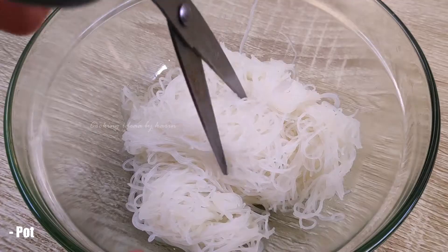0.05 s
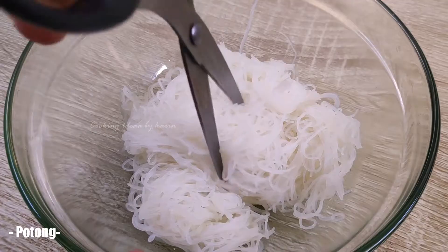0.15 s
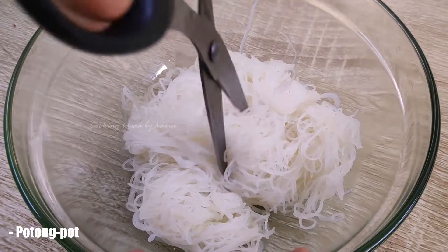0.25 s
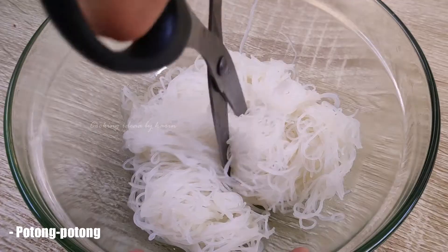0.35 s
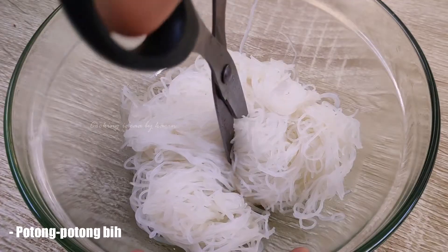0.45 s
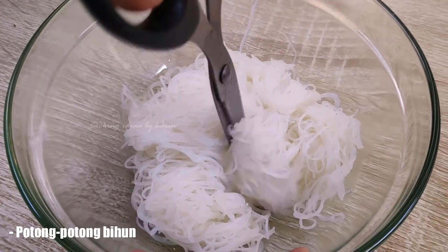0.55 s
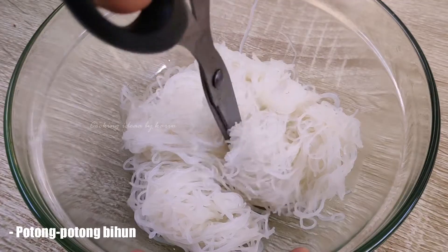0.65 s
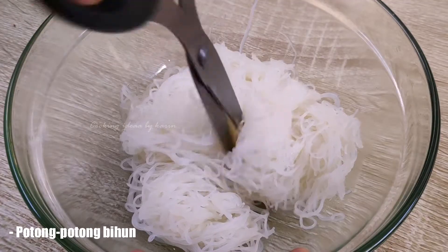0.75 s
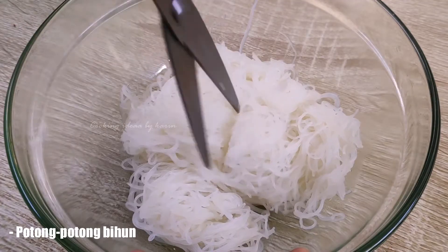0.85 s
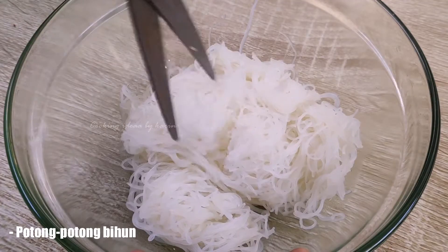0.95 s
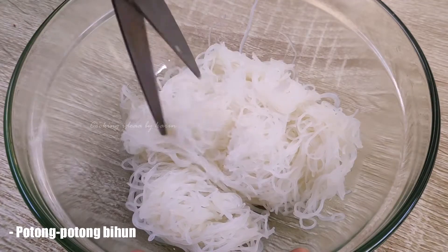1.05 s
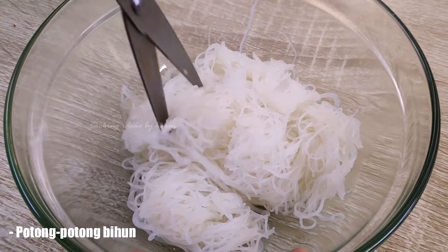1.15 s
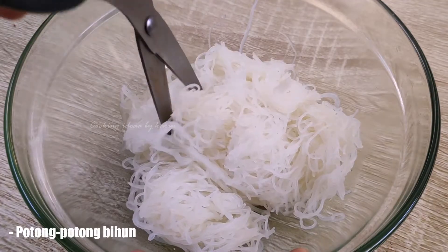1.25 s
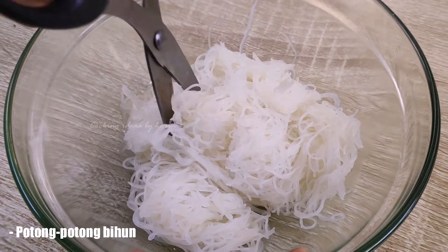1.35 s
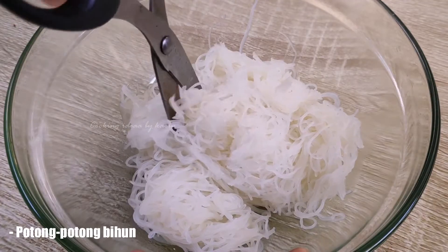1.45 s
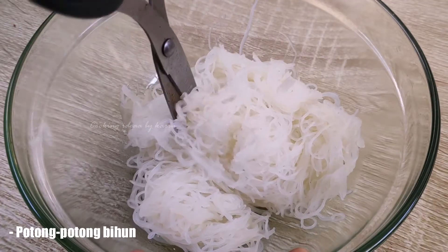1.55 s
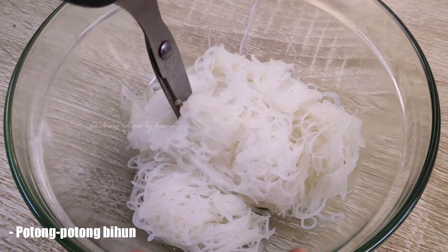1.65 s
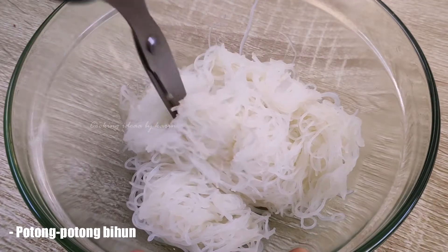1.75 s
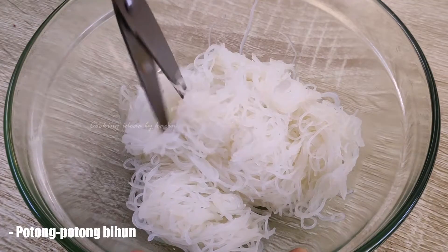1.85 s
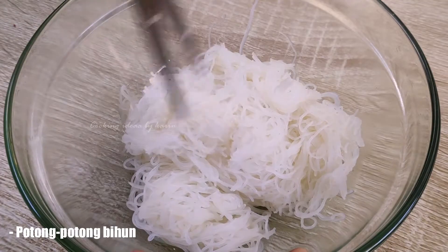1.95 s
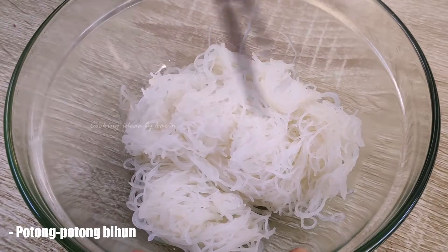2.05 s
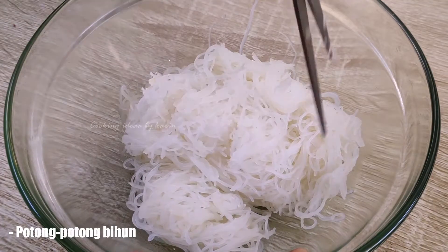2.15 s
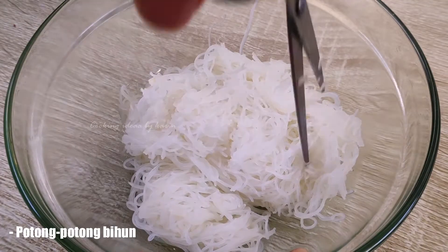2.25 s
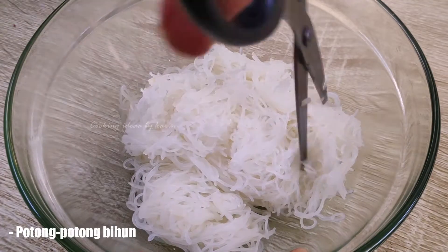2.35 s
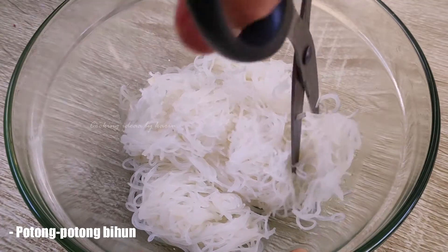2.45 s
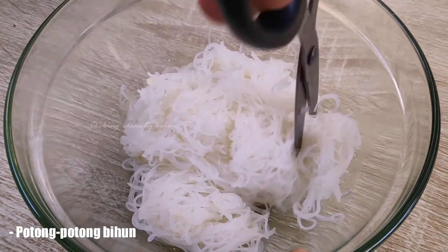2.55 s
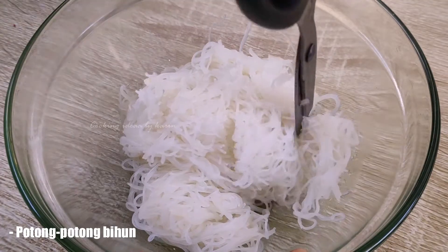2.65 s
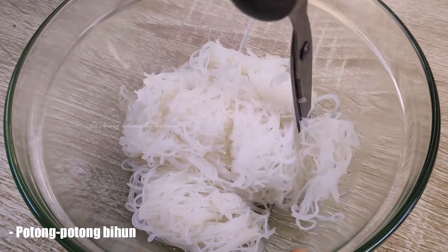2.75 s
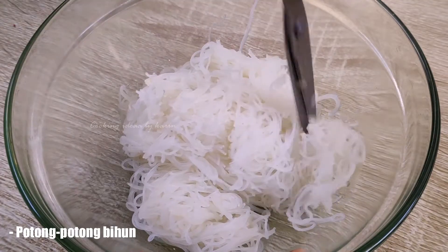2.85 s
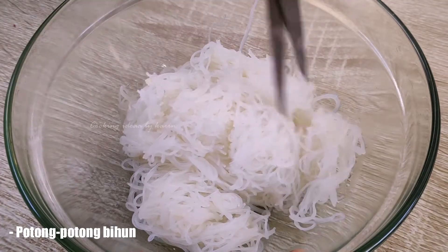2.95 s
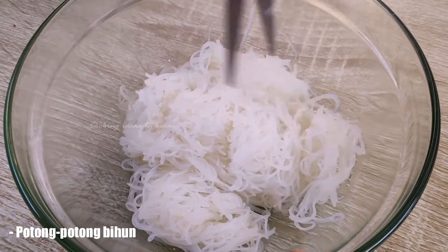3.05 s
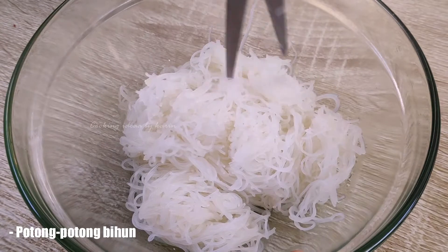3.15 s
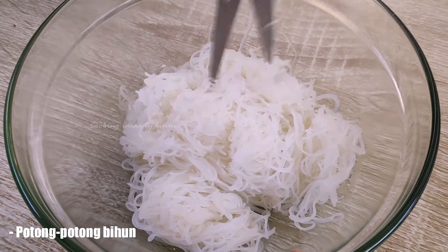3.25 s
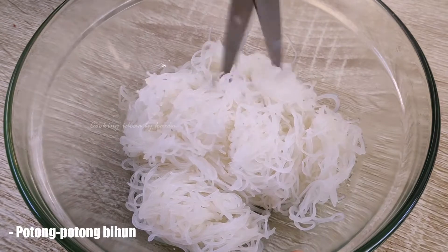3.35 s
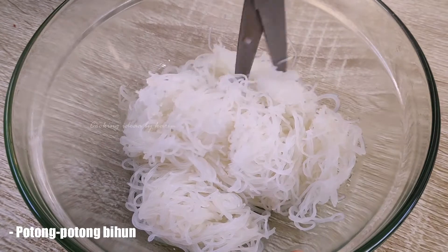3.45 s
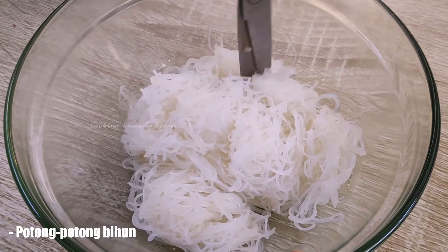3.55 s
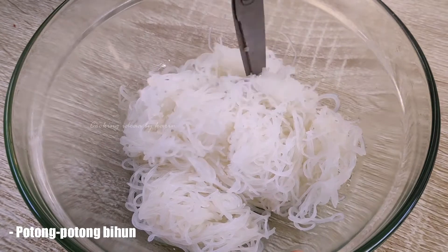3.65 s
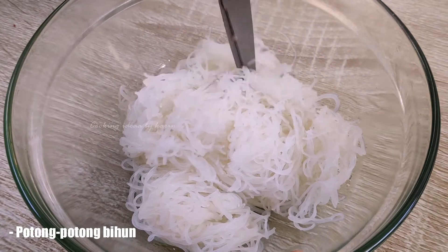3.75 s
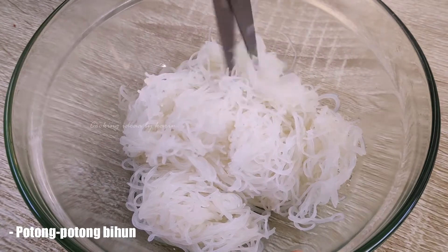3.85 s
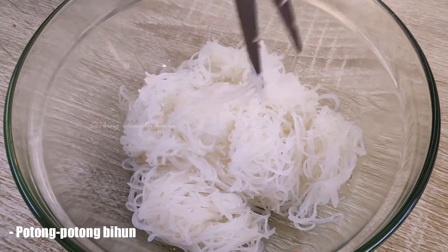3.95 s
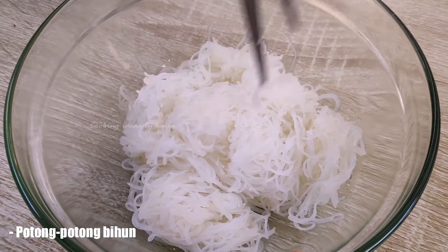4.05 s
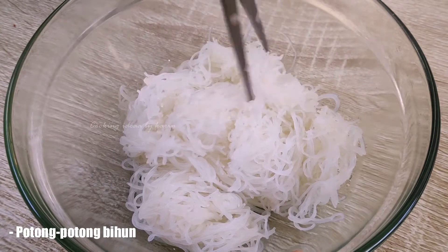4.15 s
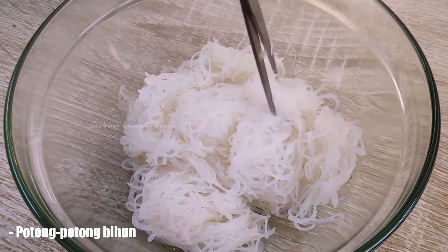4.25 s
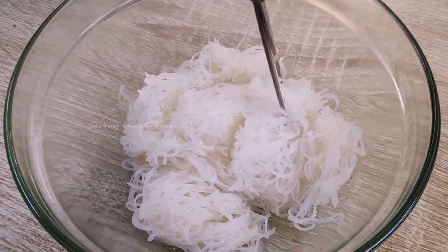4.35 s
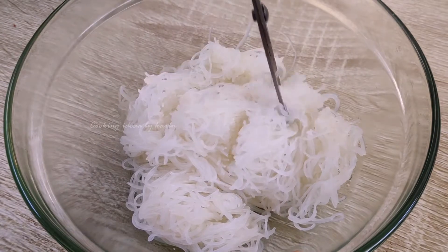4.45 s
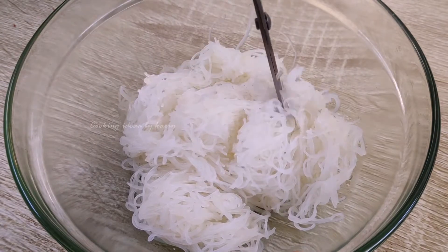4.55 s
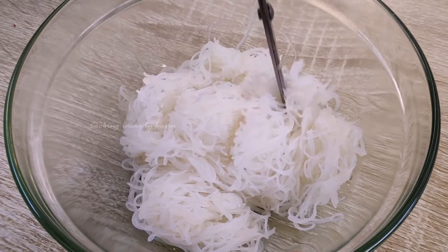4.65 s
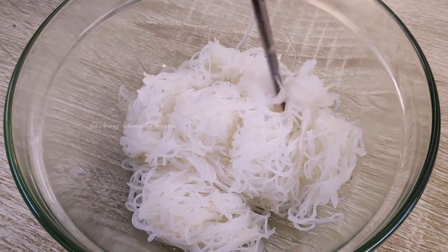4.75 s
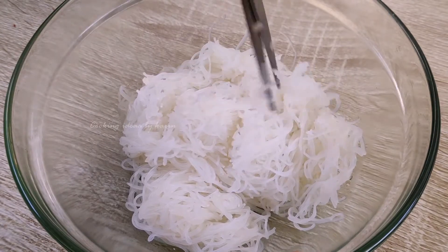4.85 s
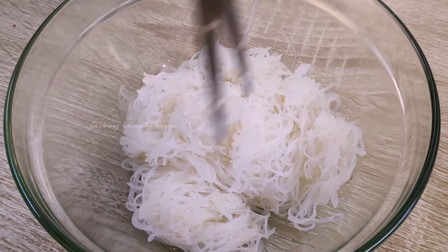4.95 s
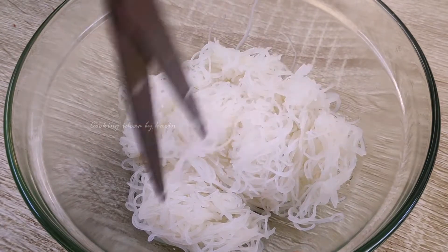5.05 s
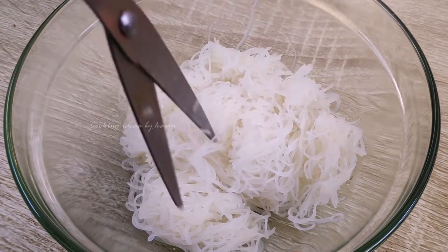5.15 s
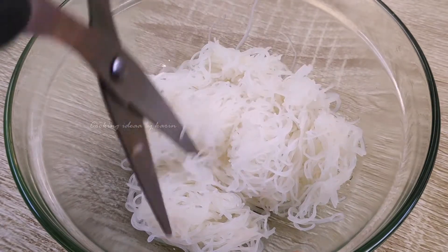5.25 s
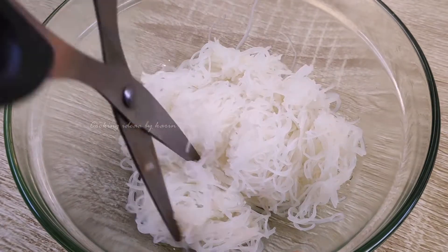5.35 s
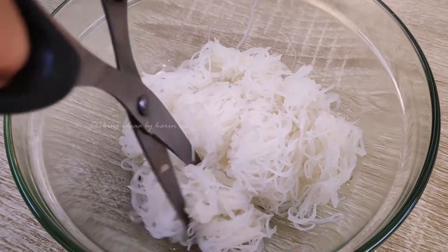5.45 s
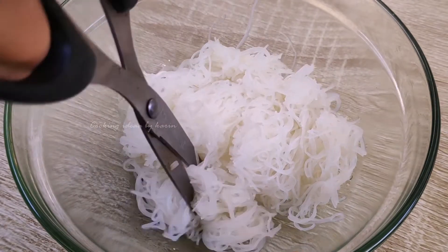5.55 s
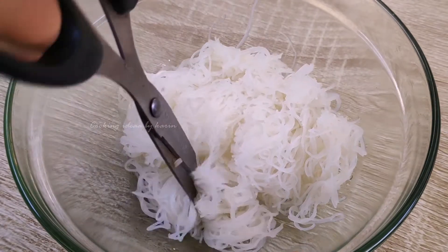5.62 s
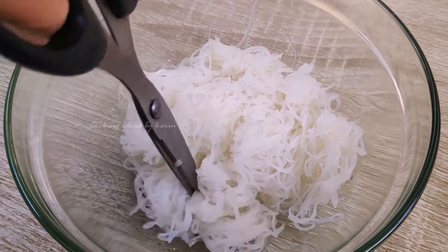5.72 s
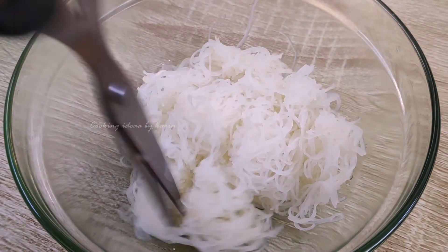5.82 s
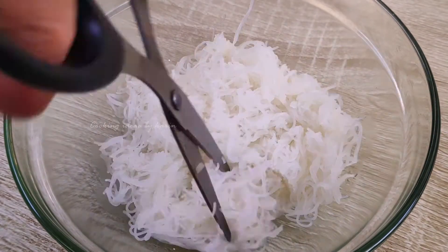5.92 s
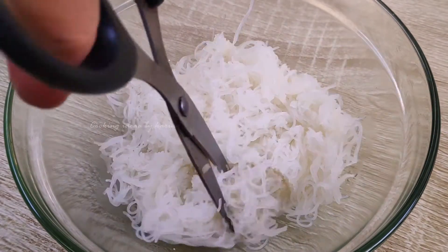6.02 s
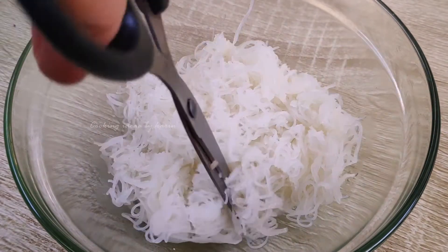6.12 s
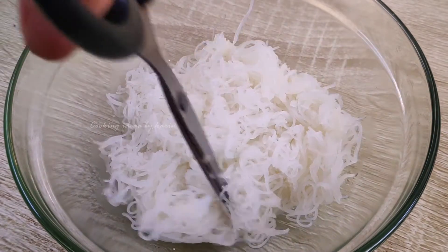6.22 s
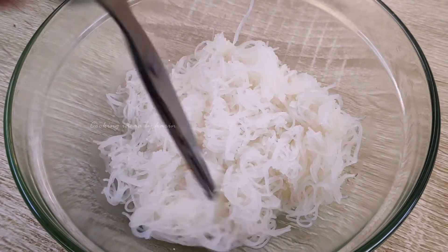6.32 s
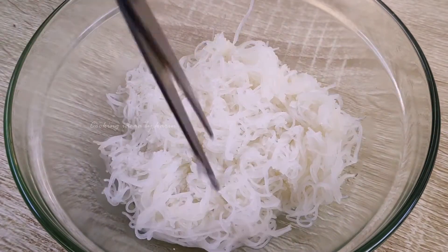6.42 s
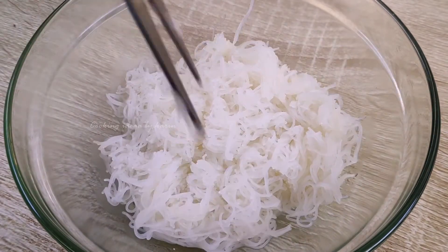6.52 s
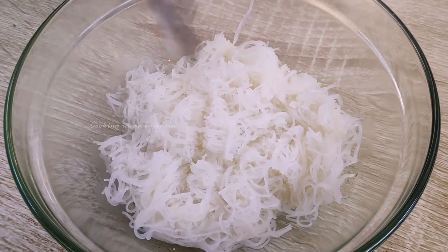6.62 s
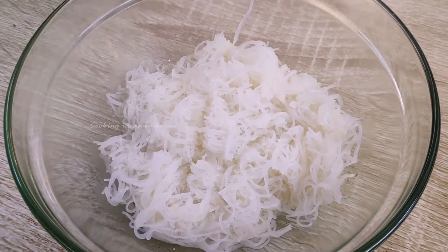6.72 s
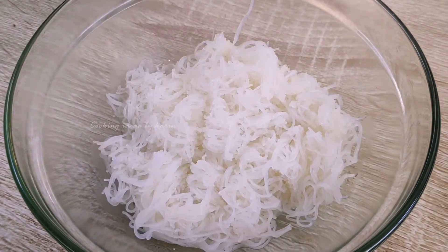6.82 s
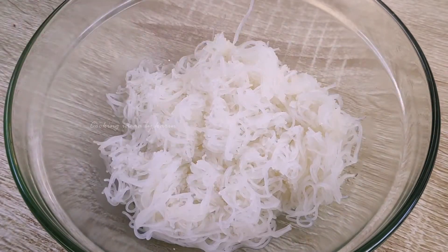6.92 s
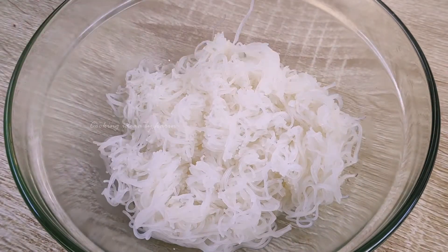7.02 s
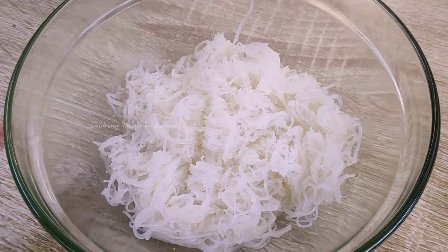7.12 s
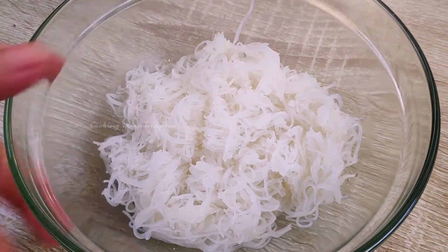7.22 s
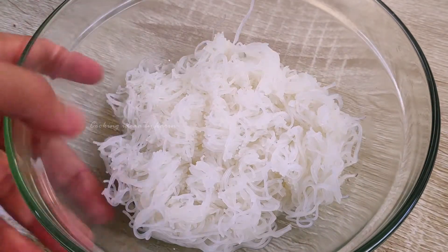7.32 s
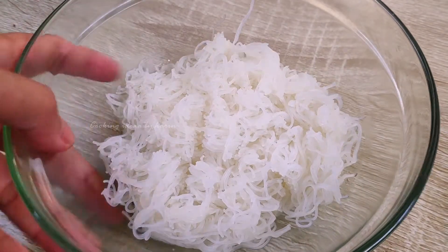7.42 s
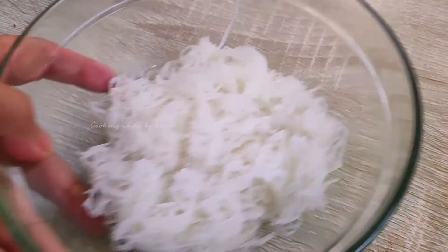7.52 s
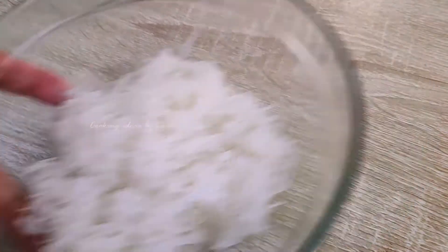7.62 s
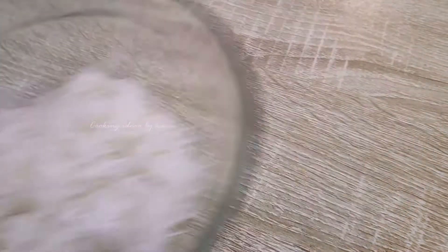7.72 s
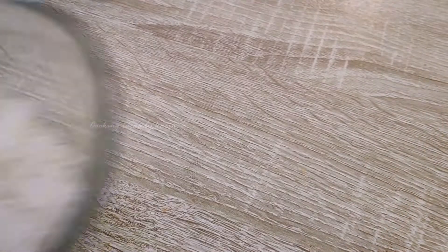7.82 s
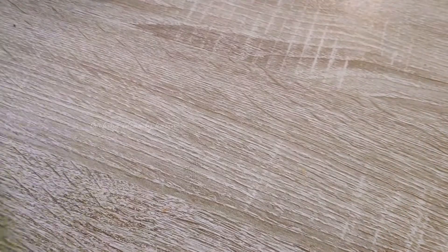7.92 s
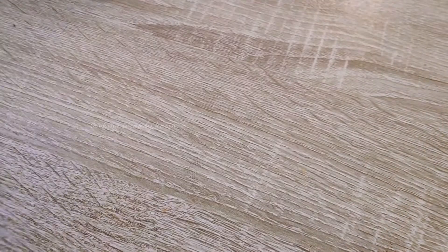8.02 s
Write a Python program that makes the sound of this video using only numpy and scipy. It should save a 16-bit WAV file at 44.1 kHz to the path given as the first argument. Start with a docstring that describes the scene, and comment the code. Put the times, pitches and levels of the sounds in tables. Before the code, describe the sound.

Very close to the microphone, steel scissors cut soaked noodles in a glass bowl on a wooden table. Each snip is a thin metal rub, small catches, then a loud, crisp clack, followed by a light reopening tick. Blade tips sometimes thud against the bowl and skid. After seven snips there is a low handling rumble, then the bowl is dragged off with a brief wooden scrape. A faint appliance hum sits in a ringing kitchen.

```python
"""Scissors snipping wet noodles

Steel kitchen scissors snip seven times through soaked rice noodles in a glass bowl on a wooden table.
The blades rub, catch and shear, then hit their stop: short bursts of noise coloured like steel, plus a ping.
A tip sometimes knocks the bowl and skids on: thuds, dying tones and uneven stick-slip clicks.
Near the end the bowl is slid away. An appliance hums as steady tones; the kitchen rings, cut once by a splice.
The close microphone's limiter ducks after each clack."""
import sys
import numpy as np
from scipy import signal
from scipy.fft import rfft, irfft
from scipy.io import wavfile
from scipy.ndimage import uniform_filter1d, minimum_filter1d

SR = 44100
rng = np.random.default_rng(int(sys.argv[2]) if len(sys.argv) > 2 else 0)


def inscribe(sig):
    """Save sig as 16-bit PCM at rate SR to the path in sys.argv[1].

    A 1-D sig is mono; a 2-D sig holds one channel per row.
    Samples are clipped to [-1, 1] before scaling.
    """
    pcm = np.round(np.clip(np.atleast_2d(sig).T, -1, 1) * 32767)
    wavfile.write(sys.argv[1], SR, pcm.astype(np.int16))


N = 356138
TIME = np.arange(N) / SR


def from_db(db):
    """Turn decibels into a gain."""
    return 10 ** (np.asarray(db) / 20)


def rms_one(x):
    """Scale to an rms (average strength) of 1."""
    return x / np.sqrt(np.mean(x ** 2) + 1e-20)


def at_hz(points, hz, axis=1):
    """Read a table column between its rows, on a log-frequency axis."""
    points = np.array(points)
    return np.interp(np.log(np.maximum(hz, 1)), np.log(points[:, 0]), points[:, axis])


def colour(x, spectrum, keep_power=True, size=4096):
    """Filter with the given spectrum; minimum phase means it responds as early as it can."""
    hz = np.arange(size // 2 + 1) * SR / size
    cepstrum = irfft(np.log(from_db(at_hz(spectrum, hz))))
    # folding the cepstrum onto its first half leaves no sound before the cause
    cepstrum[1:size // 2] *= 2
    cepstrum[size // 2 + 1:] = 0
    response = irfft(np.exp(rfft(cepstrum)))
    if keep_power:
        response = response / np.linalg.norm(response)
    return signal.oaconvolve(x, response)[:len(x)]


def drift(rate):
    """Wander at random: straight lines between normal draws, `rate` draws a second."""
    knots = rng.standard_normal(int(N / SR * rate) + 2)
    return np.interp(TIME * rate, np.arange(len(knots)), knots)


def swell(s, rise_s, fall_s):
    """Rise smoothly to 1 at time s, then fall."""
    away = np.where(TIME < s, (s - TIME) / rise_s, (TIME - s) / fall_s)
    return 1 / np.cosh(np.minimum(away, 20))


def hold(start_s, end_s, edge_s):
    """Stay up between two times, with soft edges; a long hold reaches 1."""
    return (np.tanh((TIME - start_s) / edge_s) - np.tanh((TIME - end_s) / edge_s)) / 2


def add(track, s, sound):
    """Mix a short sound in at time s."""
    i = int(round(s * SR))
    track[i:i + len(sound)] += sound[:N - i]


def contact(decay_s, size=512, count=3):
    """One touch: a dying rattle of tiny impacts with a nearly even spectrum and unit energy."""
    envelope = np.exp(-np.arange(size) / (SR * decay_s))
    rattle = rng.standard_normal(size) * envelope
    for _ in range(count):
        spectrum = rfft(rattle)
        even = irfft(spectrum / np.abs(spectrum))
        rattle = even * envelope ** 0.076
    return rattle / np.linalg.norm(rattle)


def ring(force, modes):
    """Add up dying tones; a unit click starts each at its table level."""
    out = np.zeros(N)
    for k, (hz, db, t60) in enumerate(modes):
        r = from_db(-60 / (t60 * SR))  # loss per sample
        w = 2 * np.pi * hz / SR
        # the tiny offset avoids slow arithmetic in silence
        tone = signal.lfilter([0, np.sin(w)], [1, -2 * r * np.cos(w), r * r], force + 1e-18)
        out += (-1) ** k * from_db(db) * tone
    return out


def friction(per_s, spread_db):
    """Stick-slip: dense random clicks of uneven size, rms 1."""
    slips = rng.random(N) < per_s / SR
    sizes = from_db(spread_db * np.minimum(rng.exponential(1, N), 4))
    return rms_one(slips * rng.choice([-1, 1], N) * sizes)


# sound from all around, side against mid [f/Hz, level/dB]
STEREO_WIDTH = [(100, -9), (250, -13), (500, -2), (1000, 2)]


def diffuse(size):
    """Stereo noise from all around: alike in the bass, mostly unrelated in the treble."""
    mid, side = rng.standard_normal((2, size))
    side = colour(side, STEREO_WIDTH, keep_power=False)
    return np.array([mid + side, mid - side]) / np.sqrt(2)


# spectrum shape of the room noise [f/Hz, relative level/dB per Hz]
AMBIENCE = [(20, -3), (36, 5.5), (52, -2.5), (100, -5.5), (180, -8), (290, -4.5), (420, -16), (600, -20.5),
            (1300, -26), (2400, -32), (5000, -32.5), (7700, -24), (8900, -31.5), (11000, -51), (16000, -63)]
# appliance hum tones, before the shared trim and waver [f/Hz, rms level/dB]
HUM = [(145.3, -63.5), (290.7, -64.5), (398.4, -73.5), (689.1, -84.5), (888.2, -84), (1281, -84),
       (1378, -94)]
# spectrum shape of the dull handling noise [f/Hz, relative level/dB per Hz]
RUMBLE = [(20, 2.5), (45, -8.5), (90, 3), (140, -8.5), (220, -20), (600, -29), (3000, -43)]
# dull handling rumble before the bowl is pulled
RUMBLE_START_S, RUMBLE_END_S, RUMBLE_EDGE_S, RUMBLE_DB = 5.935, 7.08, 0.015, -52.5


def background(ambience_db=-57, hum_db=-1, waver_db=2):
    """Coloured noise for the room, wavering sines for the appliance, low noise for handling."""
    air = from_db(ambience_db) * np.array([colour(side, AMBIENCE) for side in diffuse(N)])
    hum = np.zeros(N)
    for hz, db in HUM:
        level = from_db(db + hum_db + waver_db * drift(7.7))
        phase = 2 * np.pi * hz * TIME + 0.51 * drift(6.5)
        hum += level * np.sqrt(2) * np.sin(phase)
    handling = from_db(RUMBLE_DB) * hold(RUMBLE_START_S, RUMBLE_END_S, RUMBLE_EDGE_S)
    return air + hum + handling * colour(rng.standard_normal(N), RUMBLE)


# the kitchen's ringing [f/Hz, reverberation level/dB, 60 dB decay t/s]
KITCHEN = [(100, -3.5, 0.5), (493, 0, 0.54), (1232, -4.5, 0.53), (3020, -5.5, 0.73), (5900, -10.5, 0.65),
           (7900, -10.5, 0.58), (11400, -13, 0.5), (15100, -13.5, 0.37)]


def kitchen_response(build_s=0.013, echo_db=-26, echo_s=0.04, smear_s=0.0033, count=16):
    """The room's answer to a click: a tail that dies band by band, with one smeared wall echo."""
    t = TIME[:SR]
    noise, hz = rfft(diffuse(SR)), np.arange(SR // 2 + 1)
    centres = np.geomspace(80, 16000, count)
    tail = 0
    for centre, share in zip(centres, np.eye(count)):
        band = irfft(noise * np.interp(hz, centres, share), SR)
        decay = np.exp(-np.log(1000) * t / at_hz(KITCHEN, centre, axis=2))
        tail = tail + band * decay / np.linalg.norm(decay) * from_db(at_hz(KITCHEN, centre))
    echo = rng.standard_normal((2, SR)) * np.exp(-np.abs(t - echo_s) / smear_s)
    echo = from_db(echo_db) * echo / np.linalg.norm(echo[0])
    return tail * (1 - np.exp(-t / build_s)) + echo


# a faint thin whistle steps up in pitch at its loudest, then fades
WHISTLE_S, WHISTLE_RISE_S, WHISTLE_FALL_S, WHISTLE_DB = 0.125, 0.075, 0.1, -59
WHISTLE_LOW_HZ, WHISTLE_HIGH_HZ, WHISTLE_STEP_S = 2870, 2985, 0.025


def whistle(waver_hz=40, flutter_db=3.5):
    """A sine whose pitch and level flutter at random, so it sounds thin and rough."""
    step = (1 + np.tanh((TIME - WHISTLE_S) / WHISTLE_STEP_S)) / 2
    hz = WHISTLE_LOW_HZ + (WHISTLE_HIGH_HZ - WHISTLE_LOW_HZ) * step + waver_hz * drift(245.6)
    flutter = from_db(WHISTLE_DB + flutter_db * drift(127.6))
    level = flutter * swell(WHISTLE_S, WHISTLE_RISE_S, WHISTLE_FALL_S)
    return level * np.sqrt(2) * np.sin(2 * np.pi * np.cumsum(hz) / SR)


# ringing of the glass bowl, also heard in its knocks [f/Hz, level/dB, 60 dB decay t/s]
GLASS = [(5100, -18.5, 0.063), (6825, -3.5, 0.073), (8940, 1.5, 0.047), (9800, -12.5, 0.091),
         (9850, -13.5, 0.057), (12600, -18.5, 0.077), (13720, -26, 0.062)]
# spectrum shape of the bowl's foot on wood [f/Hz, relative level/dB per Hz]
SLIDE = [(30, -14), (90, 1), (150, 2), (270, 4), (420, -3.5), (600, -12.5), (1100, -16.5), (1600, -20),
         (2200, -17.5), (3500, -18), (6000, -13.5), (9000, -15), (12000, -28.5), (16000, -36.5)]
# spectrum shape of grit under the foot [f/Hz, relative level/dB per Hz]
GRIT = [(800, -29), (1650, 6), (2500, -6), (3500, -10), (8000, -22)]
# one pull drags the bowl away: it gathers speed, then slows
PULL_PEAK_S, PULL_RISE_S, PULL_FALL_S, PULL_DB = 7.745, 0.083, 0.11, -40


def bowl_slide(glass_db=-18, judder_db=2, grit_db=-18, grit_patchy_db=4):
    """The foot judders over the wood grain, louder with speed; grit grates in patches, the glass sings."""
    speed = swell(PULL_PEAK_S, PULL_RISE_S, PULL_FALL_S)
    slips = friction(per_s=3000, spread_db=0.5) * from_db(judder_db * drift(60))
    grit = friction(per_s=900, spread_db=-0.5) * from_db(grit_db + grit_patchy_db * drift(35))
    singing = from_db(glass_db) * rms_one(ring(slips, GLASS))
    return from_db(PULL_DB) * speed * (colour(slips, SLIDE) + colour(grit, GRIT) + singing)


# a blade tip meets the bowl and skids on; also used by knocks() [t/s, thud level/dB, table ring level/dB,
# glass level/dB, steel tick level/dB, skid end after the knock t/s, skid level/dB]
KNOCKS = [(1.4754, 0.5, -26.5, -23.5, -16.5, 0.28, -60.5), (2.433, -9.5, -23, -39.5, -1.5, 0.27, -53),
          (3.4888, -20.5, -46, -44, -25.5, .09, -53.5), (3.6222, -17, -36, -45.5, -26.5, 0.032, -66),
          (3.711, -5.5, -28.5, -26.5, -19.5, 0.031, -67), (5.454, -23.5, -46.5, -57.5, -39, .2, -61),
          (5.744, -12.5, -37.5, -35, -37.5, .13, -55.5), (6.063, -1, -21.5, -29, -8, .14, -51.5)]
# soft bumps on the table [t/s, width t/s, level/dB]
BUMPS = [(7.061, 0.011, -52.5), (7.995, 0.027, -42.5)]
# spectrum shapes of the low rumble and the rasp [f/Hz, relative level/dB per Hz]
SCRAPE_BODY = [(40, -2.5), (85, 10), (140, -5.5), (230, 3), (400, -2), (750, -14.5), (1500, -25.5),
               (4000, -35.5)]
SCRAPE_RASP = [(300, -16), (900, -1.5), (1260, 6), (1600, -16.5), (2500, -23.5), (8000, -35)]
# the skidding tip makes the bowl honk [f/Hz, relative level/dB, 60 dB decay t/s]
HONK = [(730, -12.5, 0.04), (1265, 0, 0.044)]
# a skid starts just after the knock; the last value sets its rasp against its rumble
SKID_DELAY_S, SKID_EDGE_S, SKID_RASP_DB = 0.013, 0.027, -10.5


def scrapes(honk_db=-12, judder_db=2.5):
    """The tip sticks and slips on the glass: a rumble, a rasp, a faint honk. Bumps only rumble."""
    skids = np.zeros(N)
    for s, *_, length_s, db in KNOCKS:
        skids += from_db(db) * hold(s + SKID_DELAY_S, s + length_s, SKID_EDGE_S)
    skids = skids * from_db(judder_db * drift(70))
    bumps = sum(from_db(db) * swell(s, width_s, width_s) for s, width_s, db in BUMPS)
    slips = friction(per_s=900, spread_db=3.5)
    rumble = colour((skids + bumps) * slips, SCRAPE_BODY)
    rasp = from_db(SKID_RASP_DB) * colour(skids * slips, SCRAPE_RASP)
    honk = from_db(honk_db) * skids * rms_one(ring(slips, HONK))
    return rumble + rasp + honk


# spectrum shape of the thud [f/Hz, relative level/dB per Hz]
THUD = [(40, -7), (90, -5), (200, -4.5), (330, 2.5), (700, -.5), (1150, -3.5), (1600, -9), (2300, -14.5),
        (3500, -17), (12000, -41.5)]
# ringing of the table and of the blade [f/Hz, relative level/dB, 60 dB decay t/s]
TABLE = [(79, -15.5, 0.26), (177.3, -8, 0.059), (237.4, -10.5, 0.17), (391, -1.5, 0.04), (530, -7, 0.064),
         (746, -4, 0.05), (909, -4, 0.022), (1123, -2, 0.0083), (1269, -12, 0.073)]
BLADE = [(2330, -11, 0.02), (3060, -23, 0.089), (4420, -10.5, 0.12), (7380, -7.5, 0.028),
         (8980, -23.5, .07), (9840, 4.5, 0.069), (10200, -2.5, .1), (10580, -11.5, 0.087),
         (11350, -3, 0.068), (12700, -6, 0.14), (13900, -16.5, .05)]
# spectrum shape of steel ticks, also of the shearing blades [f/Hz, relative level/dB per Hz]
SHEAR = [(60, -35), (400, -16), (1400, -19), (2300, -21), (4000, -12.5), (6300, -3.5), (7600, 2.5),
         (9000, -1.5), (12000, -10.5), (16000, -15.5)]
# the blade's ringing against its tick
BLADE_RING_DB = -29


def knocks(wood_db=-9.5, thud_s=0.0024, bounce_s=0.0035, bounce_db=-7, count=2):
    """A tip hits the glass and bounces once: the table thuds, bowl and blade ring briefly."""
    thud, push, glass, blade, tick = np.zeros((5, N))
    for s, thud_db, table_db, glass_db, tick_db, *_ in KNOCKS:
        add(push, s, from_db([table_db]))
        add(glass, s, from_db([glass_db]))
        add(blade, s, from_db([tick_db + BLADE_RING_DB]))
        for k in range(count):
            hit_s, softer_db = s + k * bounce_s, k * bounce_db
            add(thud, hit_s, from_db(thud_db + softer_db) * contact(thud_s))
            add(tick, hit_s, from_db(tick_db + softer_db) * contact(decay_s=0.00041))
    wood = from_db(wood_db) * (colour(thud, THUD) + ring(push, TABLE))
    return wood + ring(glass, GLASS) + ring(blade, BLADE) + colour(tick, SHEAR)


# every snip, timed at its clack; also used by blades() and clacks() [t/s, level/dB, rattle decay t/s,
# brightness level/dB, blade ping f/Hz, handle thock level/dB, closing rub level/dB,
# last catch level/dB, reopening after the clack t/s]
SNIPS = [(0.6428, 9.5, 0.0005, -1.5, 9200, -14.5, -58, -19, 0.16),
         (1.697, 10.5, 0.00077, 0.5, 9530, -4, -56, -24, 0.2),
         (2.7563, 12.5, 0.00072, -0.5, 9500, -7, -58.5, -40.5, 0.18),
         (3.6963, 11.5, 0.0022, 1, 10460, -7.5, -66, -26.5, .195),
         (4.697, 6, 0.00059, 1, 8950, -18.5, -61.5, -42, .192),
         (5.7373, 12, 0.00021, 1.5, 8550, -4.5, -57.5, -27.5, 0.15),
         (6.2348, 12.5, 0.0004, 2, 11130, -20, -60, -41, .18)]
# spectrum shape of the handles [f/Hz, relative level/dB per Hz]
THOCK = [(100, -16.5), (550, 3.5), (1100, -1), (1750, 3.5), (2600, 0.5), (4000, -5), (8000, 0)]


def handles():
    """The plastic handles meet: a short rattle, coloured to a hollow thock."""
    force = np.zeros(N)
    for s, _, _, _, _, thock_db, *_ in SNIPS:
        add(force, s, from_db(thock_db) * contact(decay_s=0.0015))
    return colour(force, THOCK)


# spectrum shape of steel rubbing on steel [f/Hz, relative level/dB per Hz]
RUB = [(300, -25.5), (1300, -18), (2200, -26), (6000, -16), (7100, -11.5), (7700, 0.5), (8400, -4),
       (10000, -21), (15000, -31.5)]
# closing: the rub is loudest a moment before the clack
CLOSE_LEAD_S, CLOSE_RISE_S, CLOSE_FALL_S = 0.083, 0.047, 0.02
# the edges catch at even steps on the way to the stop, each harder than the one before
CATCH_GAP_S, CATCH_GROWTH_DB, CATCH_RATTLE_S = 0.0212, 3.5, 0.0014
# the shear just before the stop, against the clack
SHEAR_DB = -50
# reopening: the blades come unstuck with a tick and a short rub
UNSTICK_DB, OPEN_RUB_DB, OPEN_RISE_S, OPEN_FALL_S = -26.5, -54.5, 0.008, 0.0215


def blades(rush_s=0.0047, reach_s=0.029, count=3):
    """The blades rub, catch, shear ever louder up to the stop, then come unstuck and reopen."""
    shear, rub, catches = np.zeros((3, N))
    for s, db, *_, rub_db, catch_db, reopen_s in SNIPS:
        rub += from_db(rub_db) * swell(s - CLOSE_LEAD_S, CLOSE_RISE_S, CLOSE_FALL_S)
        for k in range(count):  # counted back from the stop
            catch = from_db(catch_db - k * CATCH_GROWTH_DB) * contact(CATCH_RATTLE_S)
            add(catches, s - (k + 1) * CATCH_GAP_S, catch)
        ahead = np.abs(s - TIME)
        rush = 2 * rush_s / (ahead + rush_s) * np.exp(-ahead / reach_s)
        shear += from_db(db + SHEAR_DB) * (TIME < s) * rush
        add(catches, s + reopen_s, from_db(UNSTICK_DB) * contact(decay_s=0.001))
        rub += from_db(OPEN_RUB_DB) * swell(s + reopen_s, OPEN_RISE_S, OPEN_FALL_S)
    cutting = colour(shear * friction(per_s=3900, spread_db=5.5) + catches, SHEAR)
    return cutting + colour(rub * friction(per_s=3000, spread_db=3.5), RUB)


# spectrum shape of the steel snap [f/Hz, relative level/dB per Hz]
CLACK = [(100, -47), (500, -32.5), (1100, -24), (1700, -18.5), (2600, -21.5), (4000, -8.5), (6200, 1.5),
         (7200, -6), (9000, 7), (10600, 2.5), (12000, -6.5), (15000, -0.5), (16500, -24)]
# the ping against the clack; the noodles damp it
PING_DB, PING_DECAY_S = -19, 0.0007


def clacks(dull_hz=4500, bright_hz=13000, size=512):
    """The blades hit their stop: a bright steel snap with a heavily damped ping."""
    steel, ping = np.zeros((2, N))
    t = TIME[:size]
    for s, db, decay_s, bright_db, ping_hz, *_ in SNIPS:
        tilt = [(dull_hz, -bright_db), (bright_hz, bright_db)]
        add(steel, s, from_db(db) * colour(contact(decay_s), tilt, keep_power=False))
        tone = np.sin(2 * np.pi * ping_hz * t) * np.exp(-t / PING_DECAY_S)
        add(ping, s, from_db(db + PING_DB) * tone)
    return colour(steel, CLACK) + ping


def place(x, right_db, lag_count, scatter_db=-10, scatter_s=0.0013):
    """Delay the left port by some samples, set the right port's level, scatter a little into each."""
    ports = np.roll(x, lag_count), x * from_db(right_db)
    placed = []
    for port in ports:
        scatter = signal.oaconvolve(port, contact(scatter_s))[:N]  # off the bowl's wall
        placed.append(port + from_db(scatter_db) * scatter)
    return np.array(placed)


# a splice here cuts off whatever was still ringing
SPLICE_S = 5.935


def scene(hand_shadow_db=-8):
    """Blades close and to the right, handles behind the hand, bowl in front; all ring in the kitchen."""
    snips, steel, grips = clacks(), blades(), handles()
    bowl = knocks() + scrapes() + bowl_slide() + whistle()
    direct = place(snips, right_db=10, lag_count=7)
    direct = direct + place(steel + from_db(hand_shadow_db) * grips, right_db=6, lag_count=5)
    direct = direct + place(bowl, right_db=-1.5, lag_count=2, scatter_db=-4.0)
    sources = snips + steel + grips + bowl
    room = kitchen_response()
    early = TIME < SPLICE_S
    wet = 0
    for part in (early, ~early):  # ringing does not carry across the splice
        wet = wet + signal.fftconvolve([sources * part], room, axes=1)[:, :N] * part
    return direct + wet + background()


def limiter(x, ceiling_db=-1.44, release_db_per_s=260, size=17):
    """Each channel's gain drops just ahead of a peak and climbs back over a few hundredths of a second."""
    over_db = np.maximum(20 * np.log10(np.abs(x) + 1e-9) - ceiling_db, 0)
    climb_db = release_db_per_s * TIME
    held_db = np.maximum.accumulate(over_db + climb_db, axis=1) - climb_db
    gain_db = uniform_filter1d(minimum_filter1d(-held_db, size), size)
    return x * from_db(gain_db)


# cavity resonances of the two microphone ports [f/Hz, level/dB]
LEFT_PORT = [(4000, 1.5), (6200, -2.5), (7200, -1), (8200, 1), (8750, 8), (9400, 10), (10400, 11.5),
             (12000, 9), (15000, 0)]
RIGHT_PORT = [(4000, 2), (6200, 0), (7600, 4), (8700, -1.5), (9400, -10.5), (10500, 7.5), (12000, -10),
              (15000, 1)]
CUTOFF_HZ = 16600


def record(dry, hiss_db=-66.5):
    """Port resonances, electronic hiss, a limiter, and the top cut off."""
    ports = zip(dry, (LEFT_PORT, RIGHT_PORT))
    heard = np.array([colour(side, port, keep_power=False) for side, port in ports])
    hiss = from_db(hiss_db) * rng.standard_normal((2, N))
    limited = limiter(heard + hiss)
    low_pass = signal.ellip(10, 0.2, 80, CUTOFF_HZ, fs=SR, output="sos")
    return signal.sosfilt(low_pass, limited)


dry = scene()
out = record(dry)
inscribe(out)
```